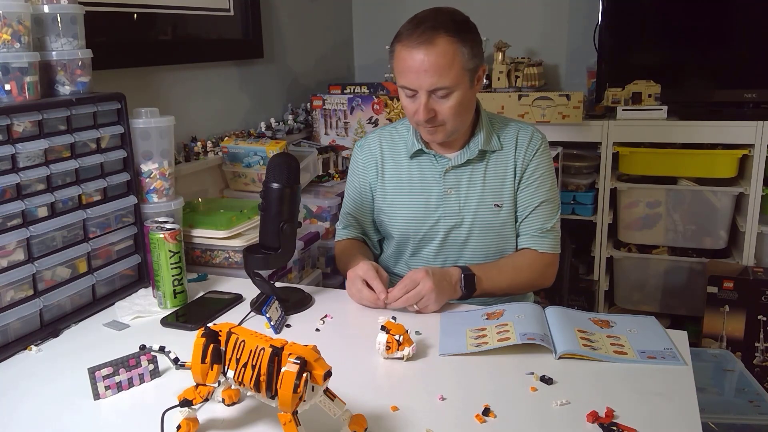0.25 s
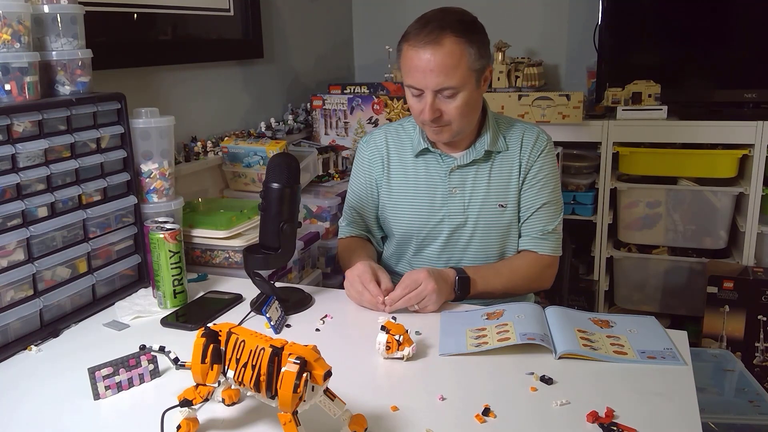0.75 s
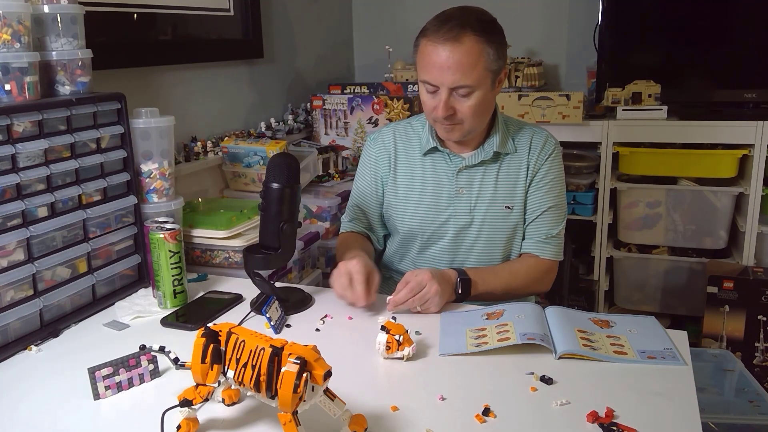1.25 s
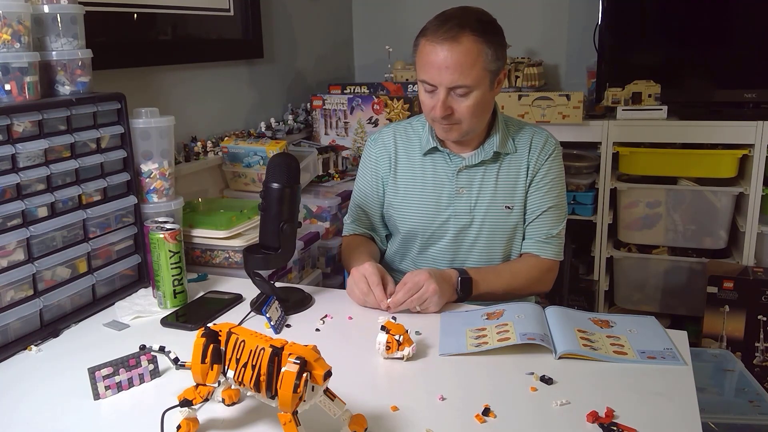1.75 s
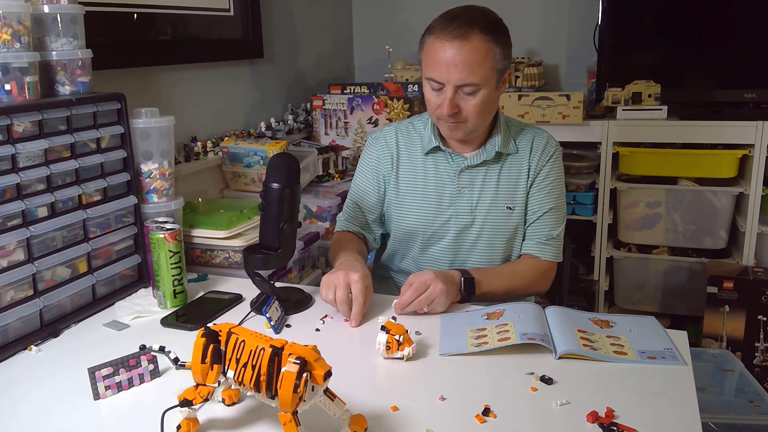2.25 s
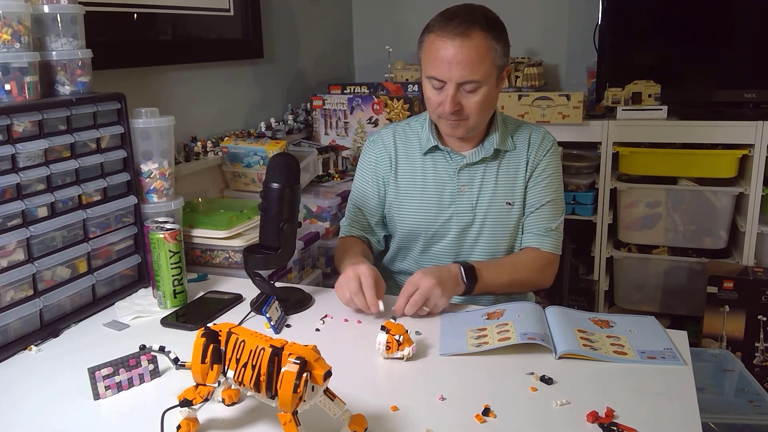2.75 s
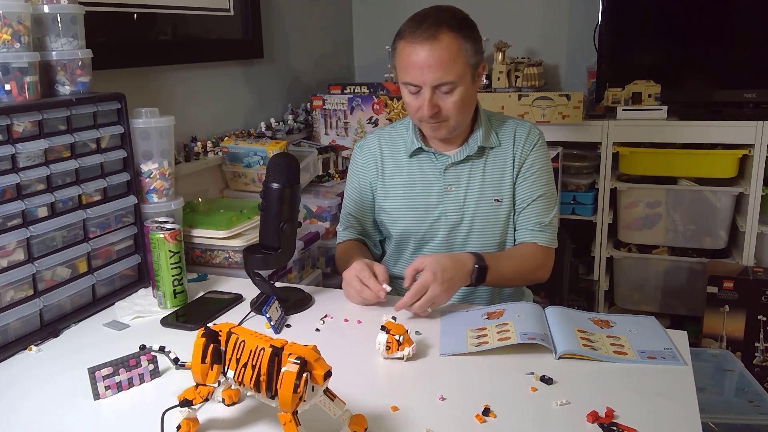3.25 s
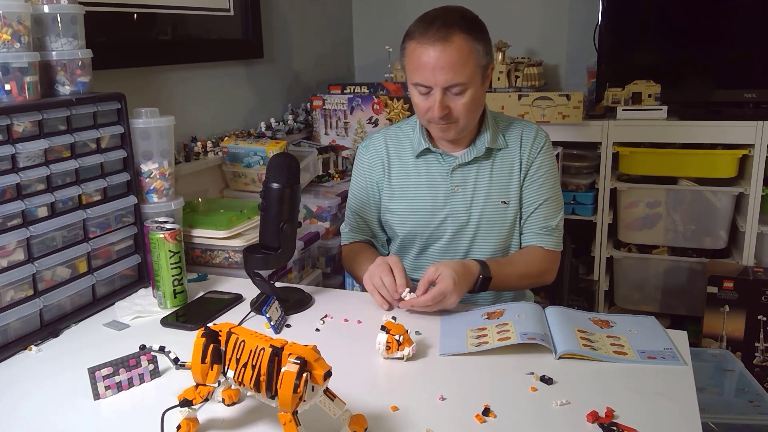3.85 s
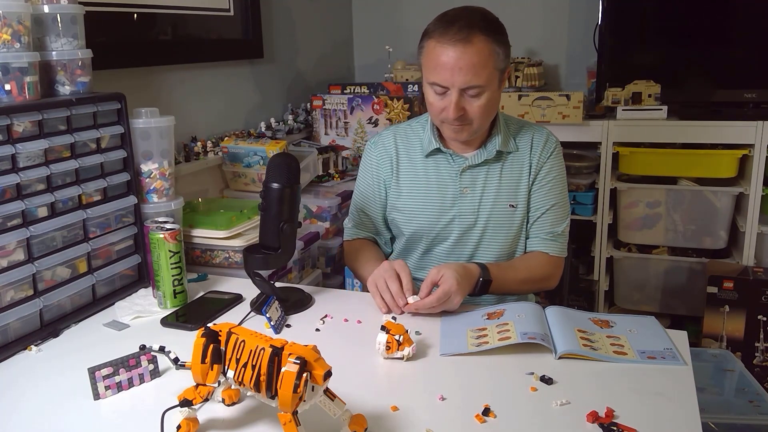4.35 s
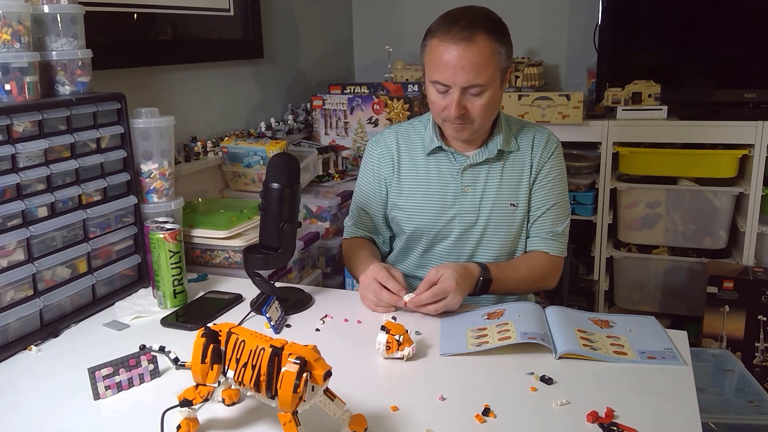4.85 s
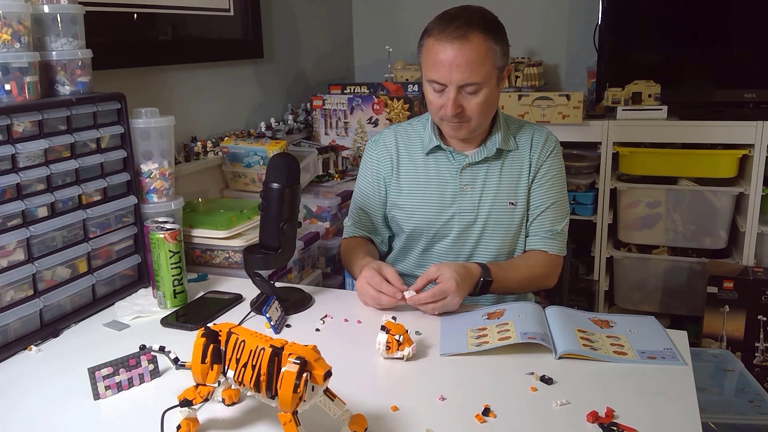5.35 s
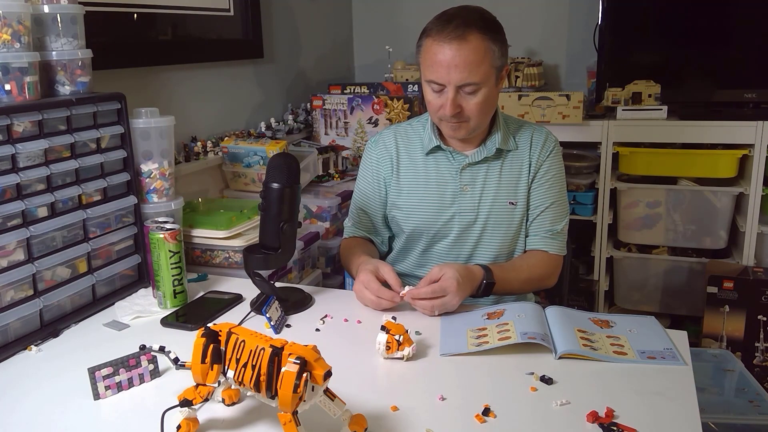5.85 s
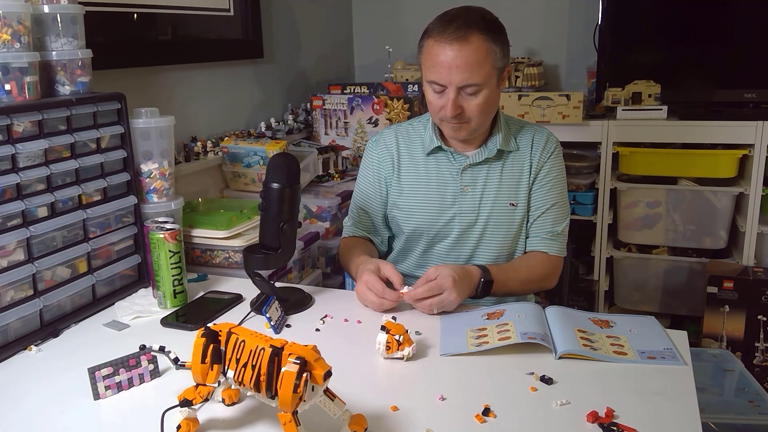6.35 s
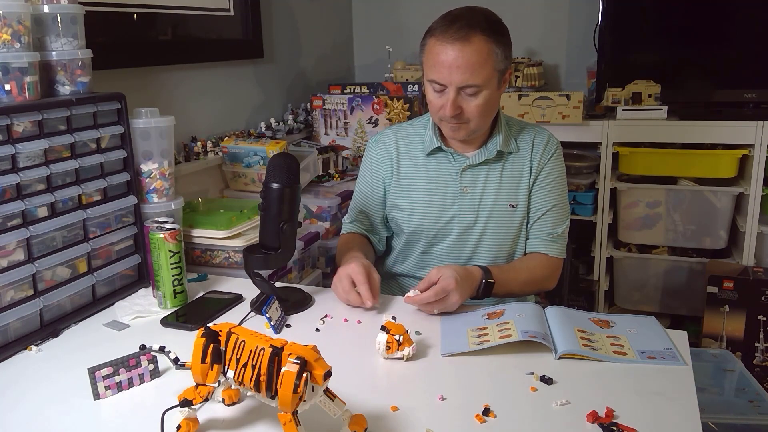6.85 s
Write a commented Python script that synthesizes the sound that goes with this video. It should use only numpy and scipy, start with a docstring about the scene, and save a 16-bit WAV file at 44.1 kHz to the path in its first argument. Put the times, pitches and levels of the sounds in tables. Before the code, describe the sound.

Sparse bright clicks of plastic bricks, a hollow rattling knock and a bouncing piece, over low table rumble and faint room hiss.

```python
"""Small plastic bricks snap and tick as hands sort and press them on a light table: bursts through resonances.
A hollow model is knocked and dragged with a rattle of its shell, and a loose brick bounces and rings.
Fingertips tap with dull puffs and fingers slide with grainy noise; pushes make the table top sway and hum
into the stand of a microphone on the same table, as drifting sines and low noise.
A small furnished room answers the contacts with decaying noise, over a faint hiss and faint wavering tones."""
import sys
import numpy as np
from scipy import signal
from scipy.fft import rfft, irfft, next_fast_len
from scipy.io import wavfile
from scipy.ndimage import map_coordinates

SR = 44100
rng = np.random.default_rng(int(sys.argv[2]) if len(sys.argv) > 2 else 0)


def inscribe(sig):
    """Save sig as 16-bit PCM at rate SR to the path in sys.argv[1].

    A 1-D sig is mono; a 2-D sig holds one channel per row.
    Samples are clipped to [-1, 1] before scaling.
    """
    pcm = np.round(np.clip(np.atleast_2d(sig).T, -1, 1) * 32767)
    wavfile.write(sys.argv[1], SR, pcm.astype(np.int16))


N = 312669  # length [samples]

# Snaps and ticks of bricks: (time [s], level [dB], dull centre [Hz], mid centre [Hz], bright centre [Hz],
# then relative levels: dull [dB], mid [dB], bright [dB], top [dB])
SNAPS = [(0.536, -47, 1600, 4500, 7700, -25, -16, -15, -30),
         (0.572, -33.5, 1290, 3100, 5870, -5.5, -10, -21, -28),
         (1.093, -49, 1600, 4200, 8000, -30, -9, -20, -24),
         (1.115, -37.5, 1300, 3780, 8300, -23, -15.5, -11, -14),
         (1.144, -44, 1700, 4460, 8760, -20, -15, -13, -13),
         (1.176, -45, 1600, 4200, 8500, -30, -13, -12, -20),
         (1.198, -47, 1600, 4500, 8500, -30, -15, -11, -22),
         (1.709, -23.5, 1820, 3570, 7600, -12.5, -12.5, -19, -37),
         (1.872, -33.5, 1230, 2630, 5800, -15.5, -11, -14.5, -28),
         (2.056, -46, 1260, 4450, 7570, -12.5, -14.5, -16, -31),
         (2.182, -44, 1410, 4170, 6580, -15.5, -12.5, -15, -29),
         (2.306, -37, 1390, 3700, 8600, -24, -20, -12, -23),
         (2.331, -31.5, 1670, 3580, 8600, -27, -29, -18.5, -28),
         (3.7, -37, 1360, 4350, 5100, -21.5, -9.5, -38, -27),
         (3.947, -8.5, 1500, 5140, 8930, -25, -14.5, -11, -19.5),
         (4.071, -36.5, 2420, 2830, 5700, -23, -13, -18, -30),
         (4.296, -24.5, 1900, 5000, 6330, -31, -15.5, -11, -28),
         (4.366, -51.5, 1130, 3240, 5810, -10.5, -8.5, -10, -21),
         (4.83, -46, 1130, 4610, 5900, -17, -13, -15.5, -24),
         (5.2, -50.5, 1640, 4430, 8470, -23, -13, -10.5, -31),
         (5.372, -57, 1640, 4300, 7500, -33, -19, -9, -29),
         (5.4, -61, 2400, 4300, 6000, -16, -15, -15, -29),
         (5.48, -12.5, 2470, 4440, 6950, -24, -18, -12, -24),
         (5.745, -26.5, 2500, 3180, 6150, -31, -19, -13, -35),
         (5.748, -32, 2000, 3160, 6800, -23, -10, -6.5, -26),
         (5.773, -19.5, 2050, 4860, 8600, -28.5, -15, -11, -21),
         (5.782, -23, 2160, 4500, 6100, -28, -16, -11, -23),
         (5.869, -31, 2500, 3140, 7100, -30, -21, -13.5, -18),
         (6.726, -45.5, 1680, 3220, 6070, -22, -16, -11.5, -14),
         (7.04, -32, 1220, 3200, 6540, -23, -15, -10.5, -42),
         (7.063, -44, 2130, 3100, 5280, -15, -14, -6.5, -28)]
# Knocks on the hollow model: (time [s], level [dB], then relative levels:
# dull [dB], mid [dB], bright [dB], top [dB], shell rattle [dB])
MODEL_KNOCKS = [(2.542, -43.5, -5, -27, -35, -31, -8), (2.557, -30.5, -7.5, -11.5, -26, -38, -11.5),
                (2.565, -27, -8, -3.5, -15.5, -47, -15.5), (2.739, -25, -9.5, -12, -21.5, -48, -5),
                (2.764, -26, -4, -15, -37, -35.5, -16), (2.79, -34.5, -9, -21, -37.5, -43.5, -12),
                (2.866, -38, -3, -15, -31, -38, -11.5), (2.939, -19, -11, -14, -19, -33, -11.5)]
# Bounces of a loose brick: (time [s], level [dB], then relative levels:
# dull [dB], mid [dB], bright [dB], top [dB], ring [dB])
BRICK_BOUNCES = [(2.94, -22, -28, -29, -16, -28, -2), (2.982, -10.5, -25.5, -16, -16, -37.5, -7),
                 (3.004, -25, -10, -5, -1, -32, -20), (3.014, -25.5, -12.5, -8, -40, -19, -2.5),
                 (3.017, -21.5, -18, -13, -7, -35, -19), (3.028, -25.5, -11, -13, -8.5, -22, -13),
                 (3.039, -17.5, -23, -15.5, -31, -44, -11), (3.046, -20, -17, -14, -10, -34, -14),
                 (3.073, -37.5, -9, -7, -8, -28, 0), (3.166, -26, -30, -21, -31.5, -30, -2.5),
                 (3.183, -30.5, -18, -14, -27, -36, -8), (3.192, -32, -17, -13.5, -11, -34, -24)]
# Usual centres of the dull, mid, bright and top part of a snap: (frequency [Hz])
PART_CENTRES_HZ = [1600, 4200, 8000, 14000]
# Resonance width of each part, for a single pass: (width over centre [ratio])
PART_SPREAD = [1, 1, 0.48, 0.35]
# Resonances of the hollow model: (centre [Hz], width [Hz], relative level [dB])
MODEL_MODES = [(439, 41, -6), (580, 38, -8.5), (962, 116, -2.5), (1430, 170, -9), (1865, 90, 2),
               (2170, 240, -3.5), (2500, 230, -4), (3100, 430, -5.5), (3840, 910, -12.5),
               (6100, 2300, -24.5)]
# Resonances of the loose brick: (centre [Hz], width [Hz], relative level [dB])
BRICK_MODES = [(6010, 240, -6.5), (8600, 120, 2.5), (14600, 130, -25)]
# The model dragged over the top: (time [s], relative level [dB])
DRAG = [(2.53, -65), (2.604, -55), (2.734, -63), (2.946, -49.5), (3.052, -44.5), (3.202, -56.5), (3.3, -68)]
# Fingertips tap the top: (time [s], dry peak level [dB])
FINGERTIP_TAPS = [(0.57, -38.5), (1.708, -41.5), (2.118, -50), (3.386, -55), (3.946, -42), (6.794, -58),
                  (6.922, -65), (7.015, -53)]
# Strokes of the fingers: (start [s], length [s], level before the low cut [dB], lower edge [Hz])
FINGER_STROKES = [(0.212, 0.046, -55, 5930), (0.807, 0.14, -57, 1400), (1.113, 0.075, -55, 4000),
                  (2.066, 0.055, -57.5, 3970), (2.182, 0.044, -60.5, 2930), (2.329, 0.034, -53.5, 3970),
                  (3.392, 0.019, -56.5, 5000), (4.498, 0.036, -68, 4040), (4.94, 0.034, -73, 4000),
                  (5.085, 0.027, -69, 5030), (6.418, 0.015, -55, 7000), (6.495, 0.13, -60.5, 3440),
                  (7.045, 0.05, -63, 1200)]
# Colour of skin on the smooth top: (frequency [Hz], relative density [dB per Hz])
SKIN_COLOUR = [(600, 10), (1200, 13), (3000, 3.5), (6000, -3.5), (9000, -5), (15000, -21.5), (15500, -44)]
# Hands land on or lean into the table top: (time [s], sway level [dB], bend level [dB], drum level [dB])
HAND_PUSHES = [(0.0, -47.5, -87, -85.0), (0.092, -45.0, -76, -82), (0.163, -38, -61.5, -71),
               (0.331, -39.5, -48, -56.5), (0.41, -39.5, -50.5, -58.5), (0.556, -25.5, -45.0, -49.5),
               (0.87, -28.5, -45.5, -46.5), (0.941, -30, -38, -48.5), (0.999, -42, -85.0, -45.5),
               (1.08, -44, -52, -85.0), (1.4, -41, -68, -96), (1.694, -29.5, -37, -52.5),
               (1.805, -30.5, -53, -60), (2.094, -29.5, -40.5, -49.5), (2.29, -36, -66.5, -72),
               (2.545, -44, -53.5, -57), (2.657, -32, -40.5, -49), (2.742, -24.5, -34.5, -39.5),
               (2.876, -27, -40, -45), (2.956, -32, -59, -41), (3.163, -35, -91, -58),
               (3.608, -43.5, -67, -68.5), (3.912, -34, -68, -87), (4.098, -44, -68.5, -94),
               (4.301, -32, -51.5, -60), (4.505, -38, -58, -87), (4.928, -41, -84, -70.5),
               (5.269, -49.5, -61, -93), (5.457, -44, -47.5, -90), (5.729, -42, -52.5, -89),
               (5.795, -36.5, -67.5, -88), (5.987, -39.5, -52.5, -89), (6.169, -47, -56.5, -90),
               (6.31, -43.5, -83, -92), (6.41, -50.5, -60.5, -82), (6.714, -35, -72, -83),
               (6.905, -40.5, -59, -56), (6.984, -33, -47.5, -45.5)]
# Dull knock of the top: (frequency [Hz], relative density [dB per Hz])
TOP_KNOCK_COLOUR = [(40, -40), (110, -8), (180, -6.5), (270, -0.5), (340, -7), (430, -5), (600, -21),
                    (1000, -16), (2000, -120)]
# Unsteady shaking of the stand: (frequency [Hz], relative density [dB per Hz])
STAND_SHAKE_COLOUR = [(15, -20), (25, -12), (45, 4.5), (65, -1), (100, -19.5), (200, -120)]
# Colour of the hiss: (frequency [Hz], relative density [dB per Hz])
HISS_COLOUR = [(40, 8.5), (70, 5), (120, -0.5), (300, -3.5), (450, -7.5), (700, -13.5), (1300, -11),
               (1750, -9.5), (2200, -11.5), (3000, -17), (8000, -21), (15200, -25.5), (15400, -66)]
# Faint appliance tones that waver: (frequency [Hz], middle level [dB rms])
HUM_TONES = [(291, -79.5), (759, -85.5)]
# Decay of the room: (frequency [Hz], time to fall 60 dB [s])
ROOM_DECAY = [(300, 1), (2000, 0.48), (8000, 0.28), (15000, 0.2)]

TAP_HZ, TAP_WIDTH_HZ, TAP_T60_S = 556, 1750, 0.02
STROKE_RISE_DB_PER_S, STROKE_FALL_DB_PER_S = 600, 191
SWAY_HZ, BEND_HZ, DRUM_HZ = 33.4, 83.2, 229.5
SWAY_RISE_S, SWAY_T60_S = 0.054, 1.68  # the sway builds slowly and rings long
STILLED_T60_S = 0.13  # an arriving hand stills the old sway
BEAT_HZ, BEAT_DEPTH = 7.48, 0.2  # a close neighbour of the sway beats with it
BEND_SWELL_S, DRUM_SWELL_S = 0.05, 0.038  # time from the push to the peak
DRUM_REST_DB = -83.5  # the drum never quite rests
HISS_DB = -62  # middle level, rms
ROOM_RISE_S = 0.0033  # the walls answer one after another
BAND_LIMIT_HZ = 16500
CONTACT_T = np.arange(SR // 4) / SR  # time within one dry contact [s]
CONTROL_STEP = 32  # samples between points of the table envelopes


def snaps():
    """Bricks snap and tick: dry bursts, each with its own resonance centres."""
    out = np.zeros(N + SR)
    for time, db, dull_hz, mid_hz, bright_hz, *parts_db in SNAPS:
        centres_hz = [dull_hz, mid_hz, bright_hz, PART_CENTRES_HZ[-1]]
        add_contact(out, time, amp(db) * snap(centres_hz, parts_db))
    return out[:N]


def model_knocks():
    """Each knock snaps, and the loose plates of the hollow model rattle on in its cavities."""
    out = np.zeros(N + SR)
    for time, db, *parts_db, shell_db in MODEL_KNOCKS:
        shell = resonances(rng.standard_normal(len(CONTACT_T)), MODEL_MODES)
        rattle = amp(-60 * CONTACT_T / 0.18) * unit(dull(shell, edge_hz=20000))
        knock = amp(-1) * snap(PART_CENTRES_HZ, parts_db) + amp(shell_db) * rattle
        add_contact(out, time, amp(db) * knock)
    return out[:N]


def brick_bounces():
    """Each bounce snaps and briefly excites the loose brick's own resonances."""
    out = np.zeros(N + SR)
    for time, db, *parts_db, ring_db in BRICK_BOUNCES:
        ring = resonances(burst(0.016), BRICK_MODES)
        ring = ring / np.abs(ring).max()
        bounce = amp(-3) * snap(PART_CENTRES_HZ, parts_db) + amp(ring_db) * ring
        add_contact(out, time, amp(db) * bounce)
    return out[:N]


def snap(centres_hz, parts_db):
    """A burst of a few milliseconds; each of its four parts has its own spray and level."""
    out = np.zeros(len(CONTACT_T))
    for hz, db, spread in zip(centres_hz, parts_db, PART_SPREAD):
        out += amp(db + 20) * steep(burst(0.015), [(hz, hz * spread, 0)])
    return out


def burst(t60):
    """A sharp first contact and a decaying spray of smaller ones."""
    spray = 0.16 * amp(-60 * CONTACT_T / t60) * rng.standard_normal(len(CONTACT_T))
    return spray + (CONTACT_T == 0)


def scrape():
    """Gritty friction of the dragged model, heard through its cavities."""
    grit = amp(2.4 * wobble(300)) * rng.standard_normal(N)
    times, levels_db = np.transpose(DRAG)
    drag_db = np.interp(np.arange(N) / SR, times, levels_db, -120, -120)
    return amp(drag_db - 4.5) * unit(dull(resonances(grit, MODEL_MODES), edge_hz=15000))


def taps():
    """Soft fingertip contacts: short dull puffs through one wide resonance."""
    out = np.zeros(N + SR)
    for time, db in FINGERTIP_TAPS:
        puff = steep(burst(TAP_T60_S), [(TAP_HZ, TAP_WIDTH_HZ, 0)])
        add_contact(out, time, amp(db) * puff / np.abs(puff).max())
    return out[:N]


def fingers():
    """Skin and bricks slide on the smooth top with a grainy hiss; a stroke rises, holds and fades."""
    t, out = np.arange(N) / SR, np.zeros(N)
    grain = unit(amp(1.1 * wobble(170)) * noise(SKIN_COLOUR))
    for start, length, db, edge_hz in FINGER_STROKES:
        rise_db = STROKE_RISE_DB_PER_S * np.maximum(start - t, 0)
        fall_db = STROKE_FALL_DB_PER_S * np.maximum(t - start - length, 0)
        stroke = amp(db - rise_db - fall_db) * grain
        out += filtered(stroke, lambda hz: hz ** 4 / (hz ** 4 + edge_hz ** 4))
    return out


def table():
    """Three plate modes answer the pushes of the hands; their phase drifts a little."""
    times, sway_db, bend_db, drum_db = np.transpose(HAND_PUSHES)
    sway_gain = swaying(times, sway_db)
    bend_gain = swell(times, bend_db, BEND_SWELL_S)
    drum_gain = swell(times, drum_db, DRUM_SWELL_S) + amp(DRUM_REST_DB)
    turn = 2 * np.pi * np.arange(N) / SR
    sway = sway_gain * np.sin(SWAY_HZ * turn + 0.5 * wobble(3.5))
    bend = bend_gain * np.sin(BEND_HZ * turn + 0.55 * wobble(10))
    drum = drum_gain * np.sin(DRUM_HZ * turn + 1.3 * wobble(20))
    # the higher plate modes blur into a dull knock
    knock = drum_gain * amp(-8) * noise(TOP_KNOCK_COLOUR)
    shake = sway_gain * amp(-15.5) * noise(STAND_SHAKE_COLOUR)
    return np.sqrt(2) * (sway + bend + drum) + knock + shake


def swaying(times, levels_db):
    """Each push starts a long beating sway and stills the one before."""
    t = np.arange(0, N, CONTROL_STEP) / SR
    since = np.maximum(t - times[:, None], 0)
    next_push = np.append(times[1:], np.inf)
    stilled = np.maximum(t - next_push[:, None], 0)
    beat = 1 - BEAT_DEPTH * np.cos(2 * np.pi * BEAT_HZ * since)
    decay = amp(levels_db[:, None] - 60 * since / SWAY_T60_S - 60 * stilled / STILLED_T60_S)
    rings = decay * (1 - np.exp(-since / SWAY_RISE_S)) * beat
    return np.interp(np.arange(N) / SR, t, rings.sum(axis=0))


def swell(times, levels_db, peak_s):
    """Each push swells to its level and dies away; the powers add."""
    points = np.arange(0, N, CONTROL_STEP)
    u = np.maximum(points / SR - times[:, None], 0) / peak_s
    swells = amp(levels_db)[:, None] * (u * np.exp(1 - u)) ** 2
    return np.interp(np.arange(N), points, np.sqrt(np.sum(swells ** 2, axis=0)))


def background():
    """Coloured room hiss with a slow drift, and faint appliance tones that waver in level and phase."""
    turn = 2 * np.pi * np.arange(N) / SR
    hum = np.zeros(N)
    for hz, db in HUM_TONES:
        gain = amp(db + 3.9 * wobble(3.36)) * np.sqrt(2)
        hum += gain * np.sin(hz * turn + 0.5 * wobble(3.8))
    drift_db = 0.4 * wobble(0.95)
    return amp(HISS_DB + drift_db) * noise(HISS_COLOUR) + hum


def room(x, wet_db):
    """The sound and the room's answer: noise with each frequency dying at its own speed."""
    hz, t, z = signal.stft(rng.standard_normal(SR // 2), SR, nperseg=256)
    decay = amp(-60 * t / along(ROOM_DECAY, hz)[:, None])
    tail = signal.istft(z * decay, SR, nperseg=256)[1]
    tail = tail * (1 - np.exp(-np.arange(len(tail)) / SR / ROOM_RISE_S))
    late = np.pad(x, (round(0.004 * SR), 0))  # the answer starts 4 ms later
    wet = signal.fftconvolve(late, tail / np.linalg.norm(tail))
    return np.pad(x, (0, len(wet) - len(x))) + amp(wet_db) * wet


def add_contact(out, time, blow):
    """One contact with its own answer of the room, placed 0.5 ms after its listed time."""
    heard = room(blow, wet_db=-10)
    out[round((time + 0.0005) * SR):][:len(heard)] += heard


def resonances(x, modes):
    """x through parallel (centre [Hz], width [Hz], level [dB]) resonances of alternating sign."""
    def response(hz):
        total = 0
        for k, (centre, width, db) in enumerate(modes):
            damping = 1j * hz * width
            total = total + (-1) ** k * amp(db) * damping / (centre ** 2 - hz ** 2 + damping)
        return total
    return filtered(x, response)


def steep(x, modes):
    """The resonances applied three times for steep flanks, at energy 1."""
    y = resonances(resonances(resonances(x, modes), modes), modes)
    return y / np.linalg.norm(y)


def dull(x, edge_hz):
    """Plastic radiates little above its edge."""
    return filtered(x, lambda hz: 1 / (1 + 1j * hz / edge_hz) ** 2)


def noise(spectrum):
    """Coloured noise of rms 1."""
    return unit(filtered(rng.standard_normal(N), lambda hz: amp(along(spectrum, hz))))


def wobble(rate):
    """A smooth random curve, rate knots a second."""
    return map_coordinates(rng.standard_normal(int(N * rate / SR) + 4), [np.arange(N) * rate / SR])


def filtered(x, response):
    """x times a response of frequency, padded so that its ringing does not wrap onto the start."""
    m = next_fast_len(x.shape[-1] + 4096)
    return irfft(rfft(x, m) * response(np.fft.rfftfreq(m, 1 / SR)), m)[..., :x.shape[-1]]


def along(points, hz):
    """Values between (frequency [Hz], value) points on a log frequency axis."""
    f, v = np.transpose(points)
    return np.interp(np.log(hz + 1), np.log(f + 1), v)


def amp(db):
    """Decibels as an amplitude factor."""
    return 10 ** (np.asarray(db) / 20)


def unit(x):
    """x scaled to rms 1."""
    return x / np.sqrt(np.mean(x ** 2) + 1e-20)


def scene():
    """All sources at one microphone."""
    plastic = snaps() + model_knocks() + brick_bounces() + scrape()
    hands = taps() + fingers()
    return (plastic + hands + table() + background())[None]


def record(dry):
    """Nothing is kept above the band limit."""
    return filtered(dry, lambda hz: hz < BAND_LIMIT_HZ)


dry = scene()
out = record(dry)
inscribe(out)
```